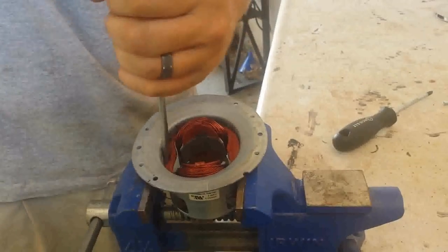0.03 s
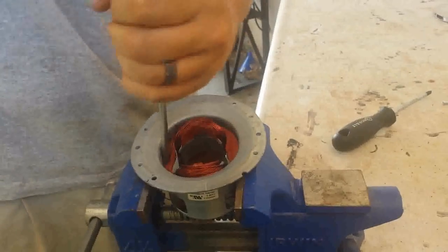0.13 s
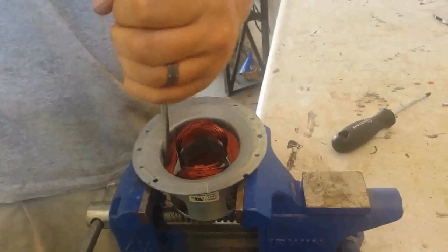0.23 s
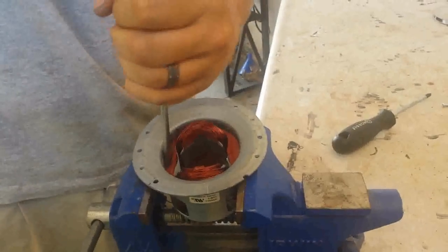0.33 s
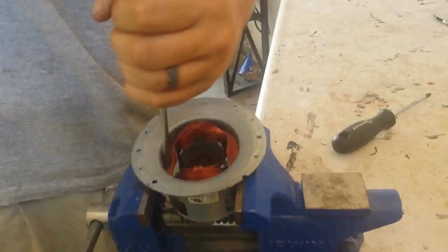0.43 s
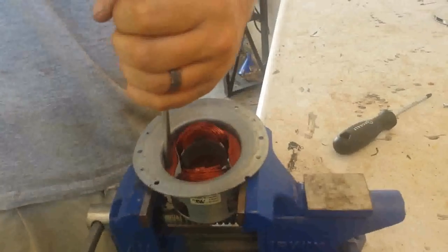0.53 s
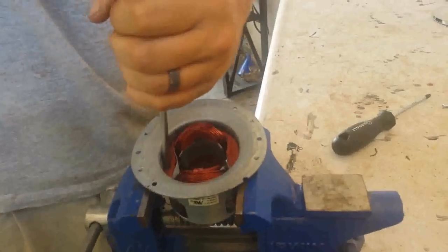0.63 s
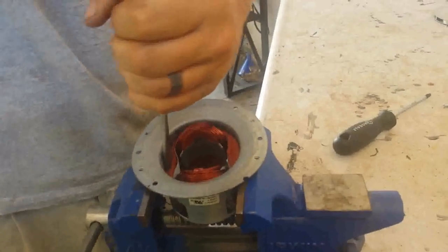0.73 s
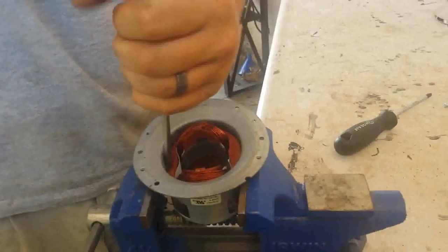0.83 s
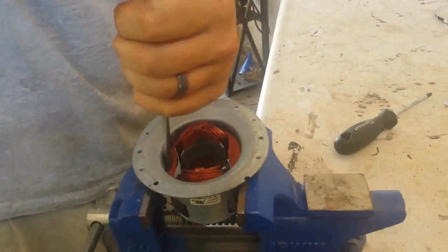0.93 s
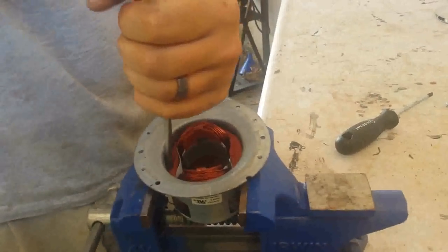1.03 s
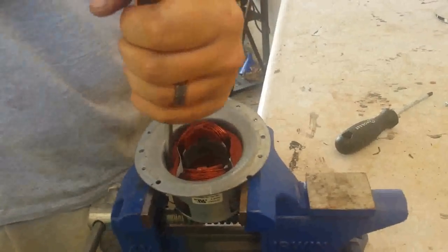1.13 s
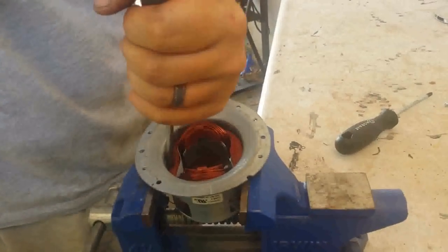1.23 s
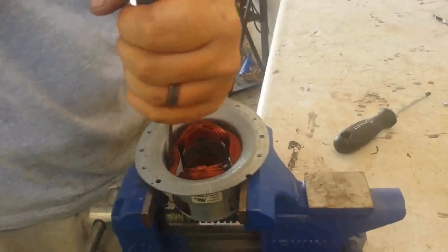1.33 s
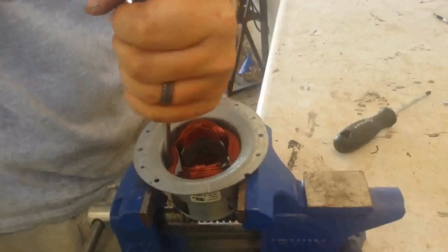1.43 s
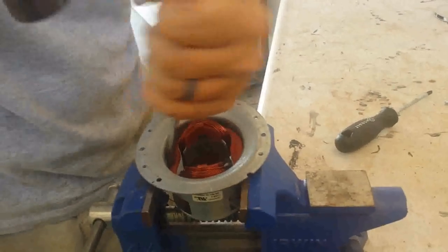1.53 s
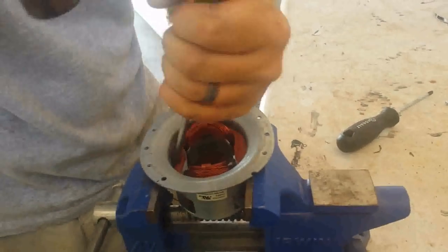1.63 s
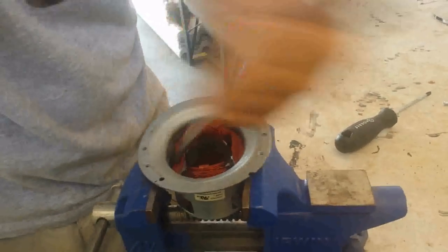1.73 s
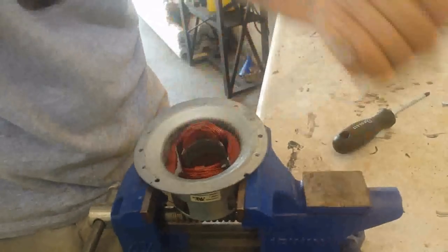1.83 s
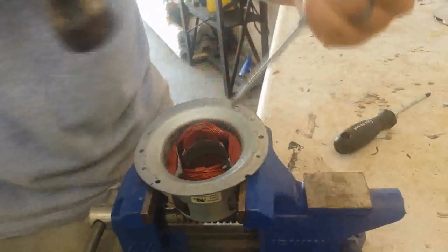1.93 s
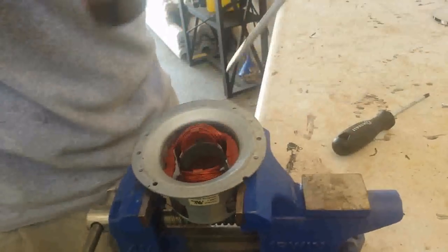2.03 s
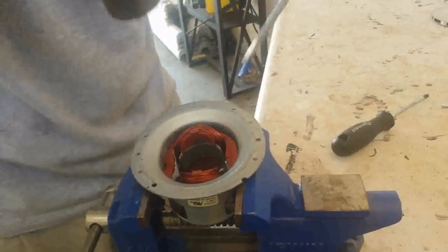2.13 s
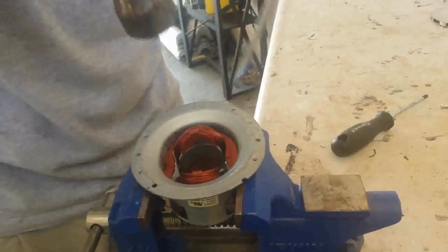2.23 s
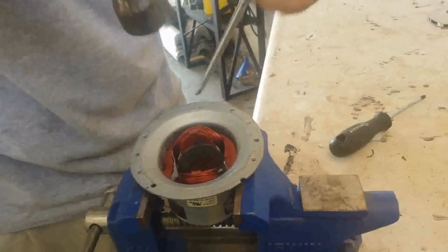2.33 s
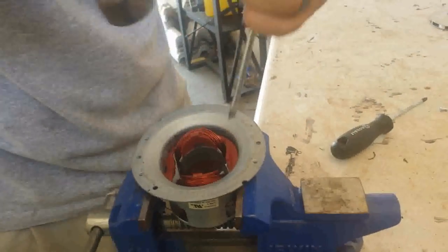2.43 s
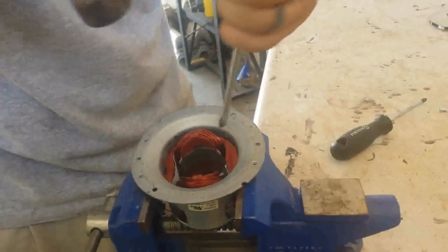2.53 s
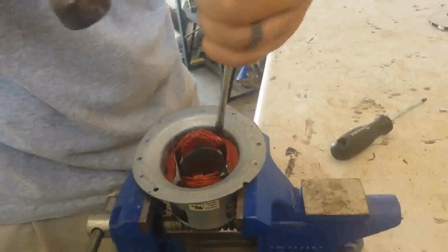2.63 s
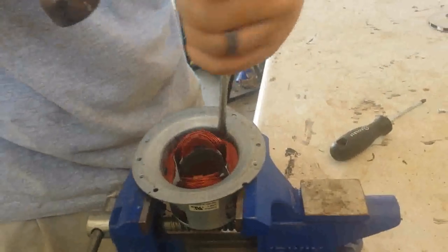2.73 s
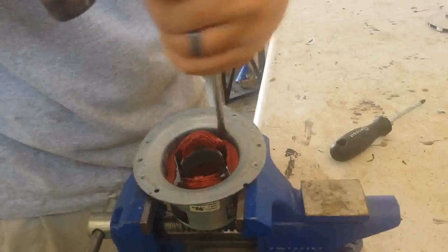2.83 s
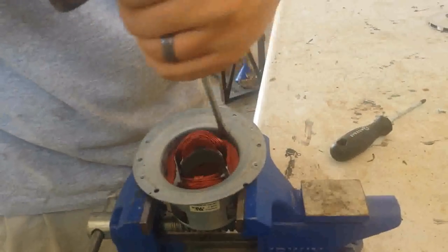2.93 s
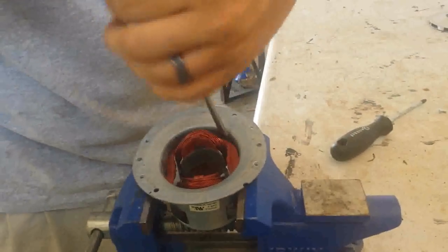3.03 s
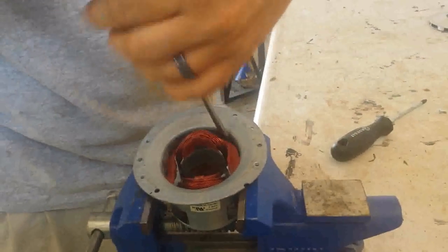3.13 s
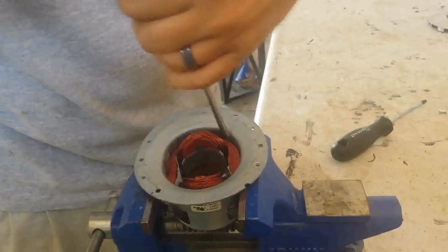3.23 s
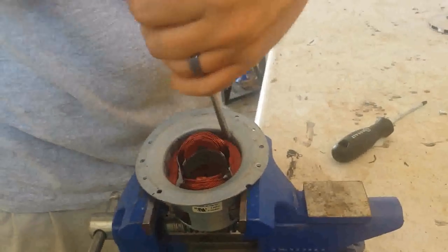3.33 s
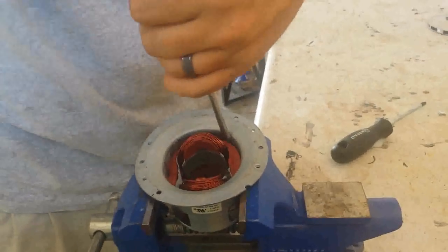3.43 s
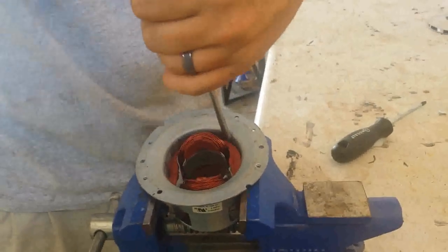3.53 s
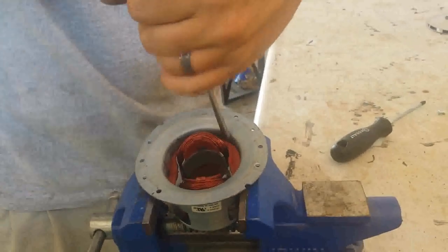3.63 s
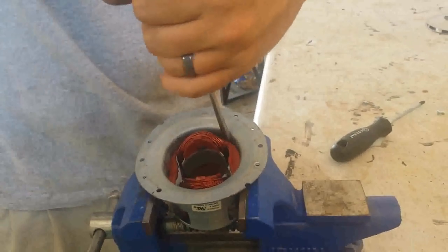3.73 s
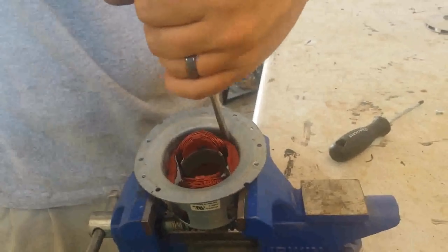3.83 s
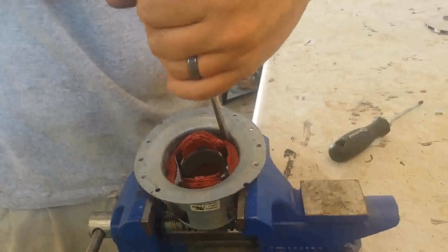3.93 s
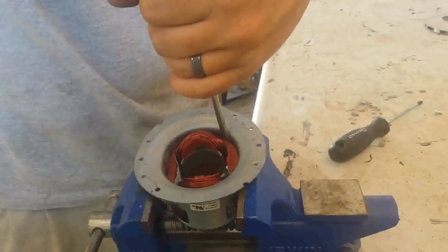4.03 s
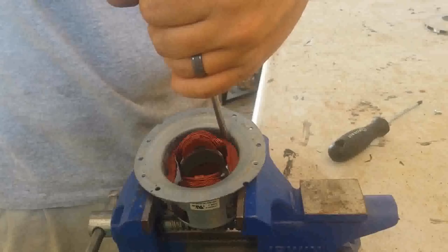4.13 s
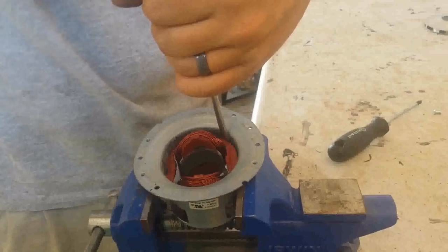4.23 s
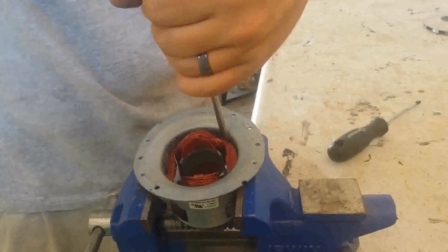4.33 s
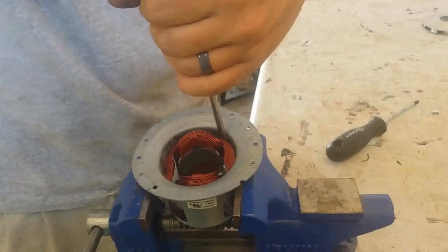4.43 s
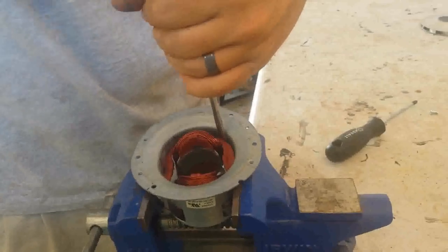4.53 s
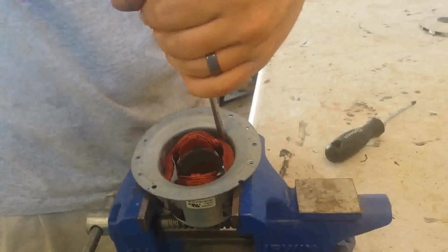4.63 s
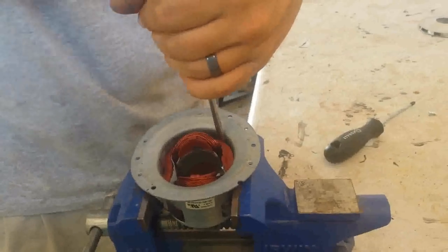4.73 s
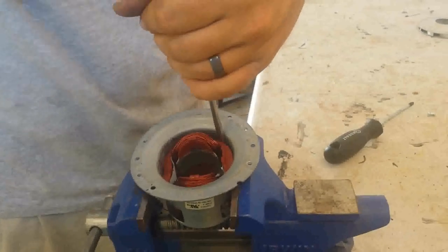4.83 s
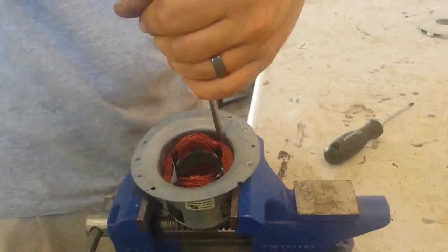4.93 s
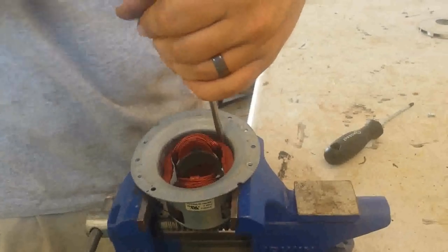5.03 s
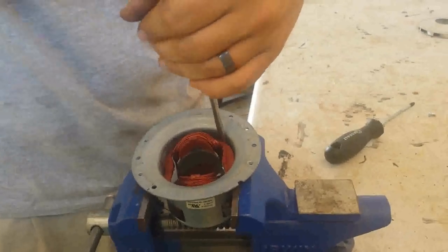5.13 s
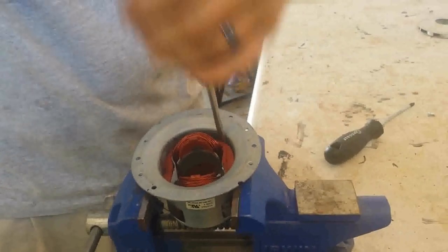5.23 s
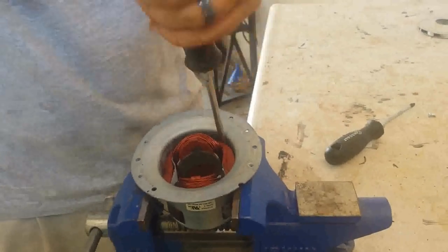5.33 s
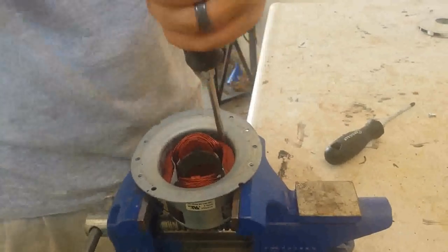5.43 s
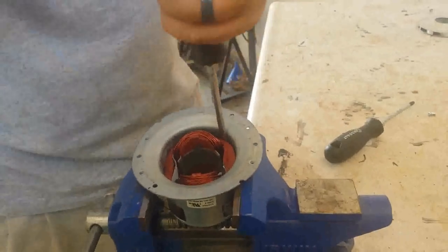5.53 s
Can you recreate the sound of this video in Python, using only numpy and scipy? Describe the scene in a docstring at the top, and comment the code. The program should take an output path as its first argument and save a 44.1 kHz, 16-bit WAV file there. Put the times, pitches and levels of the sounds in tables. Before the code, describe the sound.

Close, slightly overloaded stereo sound of hammering at a workshop bench. The clip opens in the ring of a blow just struck, with further hard blows at about 0.2, 0.5 and 0.8 seconds. Each is a sharp steel crack with a bright, chattering high clang that stops abruptly, a hollow metal housing tone, a low bench thud and a brief loose rattle in the room. The ringing dies away into quiet, low workshop air. Around 1.6 to 2.0 seconds the blade is pulled out, with soft rumble, sleeve rustle and a bright clink near 1.9. Faint skids and ticks at 2.6 to 2.8 and a light clink at 3.0 mark it being set again, followed by dull grip movement. From 3.7 seconds six blows fall steadily, roughly every 0.28 seconds, until 5.1; the first is the heaviest, with a deeper thud. The last one rings out to the end.

```python
"""A hammer drives a screwdriver into a motor housing held in a bench vise: two runs of blows.
Each blow is a noise crack, fading tones for steel, housing and bench, a shaft clang and a noise rattle.
Between the runs the blade is pulled out, clinks and skids on the housing (ticks, short rings) and is set again.
The grip rumbles and a sleeve rustles (shaped noise) over quiet workshop air.
Two unlike microphones hear it all; a limiter turns down each blow just after its first milliseconds."""
import sys
import numpy as np
from scipy import signal
from scipy.fft import rfft, irfft, next_fast_len
from scipy.io import wavfile
from scipy.ndimage import uniform_filter1d

SR = 44100
rng = np.random.default_rng(int(sys.argv[2]) if len(sys.argv) > 2 else 0)


def materialize(psi):
    """Save the field psi as 16-bit PCM at rate SR to the path in sys.argv[1].

    A 1-D psi becomes a single channel; in a 2-D psi each row is a channel.
    """
    bounded = np.clip(np.atleast_2d(psi).T, -1, 1)
    quanta = np.round(bounded * 32767).astype(np.int16)
    wavfile.write(sys.argv[1], SR, quanta)


N = 246954

# All dB values in the tables are relative; t60 is the time a sound takes to fall by 60 dB.
# hammer blows, one a row: (time [s], crack [dB], thud [dB], clang [dB], clang length [s])
BLOWS = [(-0.068, -1, -7, -10.5, 0.069), (0.206, 1.5, -1, -8, 0.058), (0.4883, -0.5, -0.5, -10, 0.067),
         (0.7676, 3, -4, -10, 0.067), (3.7358, 1.5, 5.5, -15, 0.037), (4.032, -1, -1.5, -19, 0.054),
         (4.3047, 1, -3, -9, 0.044), (4.5836, -0.5, -2.5, -10, 0.05), (4.867, -4, -5.5, -9.5, 0.067),
         (5.144, -1.5, -1.5, -15.5, 0.068)]
# the blade touching the housing:
# (time [s], level [dB], brightness [dB per octave], ring [dB], housing knock [dB])
BLADE_TOUCHES = [(1.648, -48, -16.5, -3, 9), (1.819, -15.5, 2, -15, -25), (1.853, -35.5, -6, -4.5, -2),
                 (1.8756, -2, 2, -12.5, -11.5), (2.027, -34, 0, -2, -10), (2.572, -33.5, -8, 7, -7),
                 (2.806, -35, -3.5, 0, -15.5), (3.002, -17.5, -2, -1.5, -21), (3.475, -41, -3, 0, -10),
                 (4.772, -40.5, 11, 4, -12)]
# short skids of the tip on the housing: (middle [s], half length [s], level [dB])
SKIDS = [(1.717, 0.03, -57), (2.613, 0.038, -50), (2.683, .018, -46), (2.737, 0.024, -48),
         (2.802, 0.0071, -37)]
# hand moves: holding, pulling out, bringing back, regripping, bearing down, holding:
# (start [s], length [s], grip [dB], cloth [dB])
HAND_MOVES = [(-.1, 1.04, -43.5, -52), (1.635, .25, -46.5, -55.5), (2.763, 0.28, -51, -57),
              (3.072, 0.025, -38.5, -45.5), (3.396, 0.36, -42, -45.5), (3.756, 1.58, -46, -51)]

# tones of screwdriver and housing under a blow:
# (frequency [Hz], struck at the left rim [dB], at the right rim [dB], t60 [s])
STEEL_TONES = [(1570, -22, -27, 0.17), (1973, -5.5, -24, 0.13), (2080, -23, -14.5, 0.11),
               (2290, -34.5, -22.5, 0.18), (2525, -21.5, -24, 0.24), (2727, -22, -24.5, 0.24),
               (2960, -41, -25, 0.42), (3260, -39, -21.5, 0.18), (4360, -32, -29, 0.43),
               (4260, -19.5, -27, .22), (5570, -22, -25, 0.087), (5150, -27.5, -13, 0.079),
               (5370, -38, -29, 0.31), (6300, -9, -27, 0.073), (6480, -8.5, -35, 0.14),
               (9460, -24.5, -47, 0.099), (10290, -27.5, -34, .2)]
# tones of the hollow housing: (frequency [Hz], level [dB], t60 [s])
HOUSING_TONES = [(562.6, -35, 2), (617, -27.5, 0.42), (658, -23.5, 0.34), (747, -20.5, .25),
                 (793, -33, 0.76), (858, -26.5, 0.48), (964, -17, 0.22), (1117, -19.5, 0.23),
                 (1268, -15.5, 0.11)]
# tones of vise and bench: (frequency [Hz], level [dB], t60 [s])
BENCH_TONES = [(123.44, -25, 0.87), (137.5, -12.5, 0.25), (178.9, -41.5, 1.3), (230.7, -18, 0.51),
               (257.5, -20.5, 0.38), (283.4, -38, 1.7), (316.7, -13.5, 0.22), (356, -22.5, 0.56),
               (383.8, -30.5, 0.87), (443.5, -18, 0.24), (482.2, -18, 0.23), (526, -26.5, 0.11)]
# tones of the loosely held blade: (frequency [Hz], level [dB], t60 [s])
BLADE_TONES = [(958, -20, 0.33), (1120, -16, 0.17), (1700, -35, 0.066), (1970, -21, 0.12), (2070, -8.5, .1),
               (2425, -9.5, 0.13), (2910, -16, 0.044), (3530, -9.5, 0.088), (3974, -5, 0.087),
               (4260, -17.5, 0.057), (4400, -5.5, 0.091), (5710, -1, 0.036), (6210, -8.5, 0.066),
               (7080, -15, 0.058), (8700, -24.5, 0.04)]
# the shaft chattering in its seat: (frequency [Hz], level [dB])
CLANG_TONES = [(5205, -16), (5262, -3.5), (5335, -19)]
# the long pure after-ring of the shaft: (frequency [Hz], level [dB], t60 [s])
SHAFT_TONES = [(5160, -2, 1.02), (5195, -8, 0.78)]
# the hammer head, which rings on after the opening blow: (frequency [Hz], level [dB], t60 [s])
HEAD_TONES = [(4430, -33, 0.78)]

# noise colour of a blow's crack: (frequency [Hz], density [dB per Hz])
CRACK_COLOUR = [(40, -36), (450, -17), (900, 6.5), (1600, 4.5), (2500, 0.5), (4200, 4), (6000, 7.5),
                (7500, 2), (10000, -17), (15000, -16.5)]
# noise colour of the rattle: (frequency [Hz], density [dB per Hz])
RATTLE_COLOUR = [(25, -41), (80, -58), (130, 5), (300, 15), (600, 4.5), (1100, 3), (1700, 2), (2900, 8.5),
                 (4300, 5), (5600, 10), (7600, 4.5), (8500, -2.5), (9400, -3), (12000, -13.5), (15000, -18)]
# noise colour of a blade touch: (frequency [Hz], density [dB per Hz])
CLINK_COLOUR = [(100, -19.5), (700, -25), (1700, -16.5), (2200, -8.5), (3000, -10.5), (4000, -2),
                (6500, -6.5), (8000, -7), (12000, -20.5), (15000, -33.5)]
# noise colour of the workshop air: (frequency [Hz], density [dB per Hz])
AIR_COLOUR = [(25, -32.5), (70, -9.5), (150, 9.5), (300, -5.5), (700, -9.5), (2000, -17), (6000, -17.5),
              (9000, -29), (15000, -38)]
# noise colour of the hand on the tool: (frequency [Hz], density [dB per Hz])
GRIP_COLOUR = [(25, -13), (80, -0.5), (180, 7), (280, 0), (500, -6.5), (750, -13.5), (1200, -19.5),
               (3000, -40.5)]
# noise colour of the sleeve: (frequency [Hz], density [dB per Hz])
CLOTH_COLOUR = [(200, -13), (900, 6), (2500, 0), (5500, -1), (8000, -7), (11000, -23), (15000, -17.5)]

# how fast sound dies in the workshop: (frequency [Hz], t60 [s])
ROOM_DECAY = [(60, 0.51), (300, 0.5), (700, 0.57), (1500, 0.5), (3500, 0.33), (7000, 0.3), (13000, 0.28)]
# how alike diffuse sound is at the two microphones: (frequency [Hz], likeness [0 to 1])
LIKENESS = [(130, .99), (280, 0.98), (550, 0.79), (1000, 0.38), (2000, 0)]
# tone difference of the two microphones: (frequency [Hz], left minus right [dB])
MIC_BALANCE = [(150, 0), (550, 1), (1100, 1.5), (2700, 8), (4500, 5), (5500, 6), (6800, 0), (9000, -4),
               (10500, -9), (15000, -6.5)]

TAIL = np.arange(int(.95 * SR)) / SR  # time axis of one blow or touch (s)
EDGE_HZ = 16000  # upper band limit
RESET_S = 2.5  # the tip stands on the left rim before this time, on the right rim after it
HOUSING_DB, BENCH_DB = 0.5, -1.25  # how strongly the housing and the bench join in a blow
RATTLE_PER_THUD, BENCH_PER_THUD = 0.28, .45  # dB of rattle and of bench shake for each dB of thud
AFTER_RING_DB, JAM_DB_PER_S = -21, 248.5  # the longer the shaft chatters, the less pure ring is left
SWELL_LEFT_S, SWELL_RIGHT_S = .011, .025  # the chatter builds more slowly on the right rim
CONTACT_T60_S = 0.045  # how fast the tick of a touch dies
CLINK_ROOM_DB, ROOM_PER_KNOCK = -5.5, 0.54  # harder knocks fill the room more (dB, dB per dB)
MOVE_ATTACK_S, MOVE_RELEASE_S = .02, 0.33  # a move starts quickly and settles slowly


def amp(db):
    """Turns decibels into gain."""
    return 10 ** (np.asarray(db) / 20)


def evened(x):
    """Scales a signal to an average strength (rms) of 1."""
    return x / np.sqrt(np.mean(x ** 2) + 1e-20)


def read(points, hz):
    """Reads a table between its points, on a log-frequency axis."""
    f, value = np.transpose(points)
    return np.interp(np.log(hz + 1), np.log(f + 1), value)


def add(mix, s, sound):
    """Mixes a stereo sound in at time s, which may lie before the start."""
    start = round(s * SR)
    sound = sound[:, max(-start, 0):]
    part = mix[:, max(start, 0):][:, :sound.shape[1]]
    part += sound[:, :part.shape[1]]


def fade(t60):
    """Fades steadily in dB along the tail, by 60 dB in t60 seconds."""
    return np.exp(-np.log(1000) * TAIL / t60)


def rise(seconds):
    """Gives a sound a soft start along the tail."""
    return 1 - np.exp(-TAIL / seconds)


def noise(spectrum, size, tilt_db=0, direct=False, lag_s=5.5e-5):
    """Coloured stereo noise, diffuse or direct, reaching the right microphone slightly before the left."""
    length = next_fast_len(size, True)
    hz = np.fft.rfftfreq(length, 1 / SR)
    right, other = rfft(rng.standard_normal((2, length)))
    same = 0.6 * np.ones(len(hz)) if direct else read(LIKENESS, hz)
    same = np.clip(same, -1, 1)
    left = same * right + np.sqrt(1 - same ** 2) * other
    left = left * np.exp(-2j * np.pi * hz * lag_s)  # the delay
    octaves_above_1k = np.log2(np.maximum(hz, 1000) / 1000)
    colour = amp(read(spectrum, hz) + tilt_db * octaves_above_1k)
    return evened(irfft(np.array([left, right]) * colour, length)[:, :size])


def wander(rate_hz, rows, step=128):
    """Slow random drift of height and phase along the tail (rms about 1), one row a tone."""
    steps = rng.standard_normal((rows, 2, len(TAIL) // step + 2))
    memory = np.exp(-2 * np.pi * rate_hz * step / SR)
    slow = signal.lfilter([1], [1, -memory], steps[:, 0] + 1j * steps[:, 1])
    # reversed, so that the drift is already in full swing at the strike
    slow = slow[:, ::-1] / np.sqrt(np.mean(abs(slow) ** 2))
    return [np.interp(np.arange(len(TAIL)) / step, np.arange(len(row)), row) for row in slow]


def ring(modes, scatter_db, blur=0):
    """Struck metal as fading tones, different each time, blurred by reflections, stereo apart when high."""
    out = np.zeros((2, len(TAIL)))
    blur = np.clip(blur, 0, 1)
    chances = rng.standard_normal((len(modes), 3))
    for (hz, db, t60), (size, turn, apart), drift in zip(modes, chances, wander(20, len(modes))):
        # the less alike the microphones hear this pitch, the more its phases part
        spread = np.arccos(np.clip(read(LIKENESS, hz), -1, 1)) * np.sign(apart) / 2
        tone = amp(db + scatter_db * size) * fade(t60) * np.exp(2j * np.pi * (hz * TAIL + turn))
        tone = tone * (np.sqrt(1 - blur) + np.sqrt(blur) * drift)
        out += (tone * np.exp(1j * np.array([[spread], [-spread]]))).real
    return out


def resonant(x, depth_db, size=2 ** 16, order=70):
    """Housing and vise have countless tones: narrow peaks and valleys, deepest in the treble."""
    hz = np.fft.rfftfreq(size, 1 / SR)
    peaks = evened(np.convolve(rng.standard_normal(len(hz)), np.hanning(2 * order), "same"))
    gain = amp(depth_db * peaks * np.minimum(hz / 1000, 1))  # shallower below 1 kHz
    return evened(irfft(rfft(x, size) * gain, size)[..., :x.shape[-1]])


def reverberate(x):
    """Lets each frequency band die at the speed of the workshop."""
    hz, t, z = signal.stft(x, SR, nperseg=256)
    decay = np.exp(-np.log(1000) * t / read(ROOM_DECAY, hz)[:, None])
    return signal.istft(z * decay, SR, nperseg=256)[1][:, :len(TAIL)]


def clatter(depth_db, t60, size=130):
    """Uneven rebounds of loose parts: a gain that jumps about every few milliseconds and then settles."""
    jumps = evened(uniform_filter1d(rng.standard_normal(len(TAIL)), size=size))
    return amp(depth_db * jumps * fade(t60))


def workshop_air(level_db=-55.5):
    """The quiet air of the workshop: steady, low-heavy noise."""
    return amp(level_db) * noise(AIR_COLOUR, N)


def hands(uneven_db=1.5):
    """The grip shifts on the tool with a dull rumble while the sleeve brushes the shirt."""
    start, length, grip_db, cloth_db = np.transpose(HAND_MOVES)[:, :, None]
    t = np.maximum(np.arange(N) / SR - start, 0)
    moving = (1 - np.exp(-t / MOVE_ATTACK_S)) * np.exp(-np.maximum(t - length, 0) / MOVE_RELEASE_S)
    catches = uneven_db * evened(uniform_filter1d(rng.standard_normal(N), size=900))
    # where moves overlap, the stronger one counts
    grip = (amp(grip_db) * moving).max(0) * amp(catches) * noise(GRIP_COLOUR, N)
    cloth = (amp(cloth_db) * moving).max(0) * amp(catches / 2) * noise(CLOTH_COLOUR, N)
    return grip + cloth


def clang(length_s, swell_s, stop_s=0.0032, chatter_db=4.5):
    """The shaft sings as it chatters in its seat after the blow, until it jams."""
    chatter = evened(uniform_filter1d(rng.standard_normal(len(TAIL)), size=220))
    stop = (1 - np.tanh((TAIL - length_s) / stop_s)) / 2
    swell = rise(swell_s) ** 2 * stop * amp(chatter_db * chatter)
    phases = 2 * np.pi * rng.random((len(CLANG_TONES), 2, 1))
    tones = sum(amp(db) * np.sin(2 * np.pi * hz * TAIL + phase)
                for (hz, db), phase in zip(CLANG_TONES, phases))
    return swell * tones


def hammer(snap_db=6, snap_t60=0.0015, knock_db=-1, knock_t60=0.024,
           rattle_db=-10.0, alike=0.25, peaky_db=1.5, clatter_db=3):
    """Steel on steel: a crack, ringing metal, the heavier bench swinging up later, a rattle in the room."""
    out = np.zeros((2, N))
    alike = np.clip(alike, 0, 1)
    usual = noise(RATTLE_COLOUR, len(TAIL))  # blow after blow travels the same paths
    for s, crack_db, thud_db, clang_db, clang_s in BLOWS:
        on_right = s > RESET_S
        contact = amp(snap_db) * fade(snap_t60) + amp(knock_db) * fade(knock_t60)
        crack_noise = noise(CRACK_COLOUR, len(TAIL), direct=True)
        crack = amp(crack_db) * crack_noise * contact * rise(0.0011)

        fresh = noise(RATTLE_COLOUR, len(TAIL))
        paths = resonant(np.sqrt(alike) * usual + np.sqrt(1 - alike) * fresh, peaky_db)
        rattle = amp(rattle_db + RATTLE_PER_THUD * thud_db) * clatter(clatter_db, t60=0.57)
        rattle = rattle * reverberate(paths) * rise(0.02)

        modes = [(hz, right_db if on_right else left_db, t60)
                 for hz, left_db, right_db, t60 in STEEL_TONES]
        steel = ring(modes, scatter_db=1.2, blur=.55) * rise(.003)
        shaft = amp(AFTER_RING_DB - JAM_DB_PER_S * clang_s) * ring(SHAFT_TONES, scatter_db=2.0)
        housing = ring(HOUSING_TONES, scatter_db=0.5, blur=0.56) * rise(0.0029)
        housing = amp(HOUSING_DB + thud_db) * housing
        bench = ring(BENCH_TONES, scatter_db=3.5, blur=0.14) * rise(0.0061)
        bench = amp(BENCH_DB + BENCH_PER_THUD * thud_db) * bench
        singing = amp(clang_db) * clang(clang_s, SWELL_RIGHT_S if on_right else SWELL_LEFT_S)
        add(out, s, crack + rattle + steel + shaft + housing + bench + singing)
    add(out, BLOWS[0][0], ring(HEAD_TONES, scatter_db=1.5))
    return out


def blade(peaky_db=3.0):
    """Light touches of the blade: a bright tick, a short ring, a housing knock and the room's answer."""
    out = np.zeros((2, N))
    for s, db, tilt_db, ring_db, knock_db in BLADE_TOUCHES:
        near = noise(CLINK_COLOUR, len(TAIL), tilt_db, direct=True)
        far = noise(CLINK_COLOUR, len(TAIL), tilt_db)
        near, far = resonant(np.array([near, far]), peaky_db)
        tick = near * fade(CONTACT_T60_S)
        tone = amp(ring_db) * ring(BLADE_TONES, scatter_db=-3.0, blur=1.0)
        knock = ring(BENCH_TONES + HOUSING_TONES, scatter_db=0.6) * fade(1.0)  # damped by the hand
        knock = amp(knock_db) * knock
        room = amp(CLINK_ROOM_DB + ROOM_PER_KNOCK * knock_db) * clatter(depth_db=3.0, t60=1.1)
        room = room * reverberate(far) * rise(0.0012)
        add(out, s, amp(db) * (tick + tone + knock + room) * rise(0.00084))
    return out


def slide(catches_per_s=900, damping=3):
    """The sliding tip catches on the casting many times a second and keeps the blade ringing."""
    catches = (rng.random(N) < catches_per_s / SR) * rng.standard_normal(N)
    modes = ring([(hz, db, t60 / damping) for hz, db, t60 in BLADE_TONES], scatter_db=4.5)
    rubbing = evened(signal.oaconvolve(catches[None], modes, axes=1)[:, :N])
    t = np.arange(N) / SR
    # each skid swells and fades
    return rubbing * sum(amp(db) * np.exp(-((t - s) / half_s) ** 2) for s, half_s, db in SKIDS)


def scene():
    """The work at the bench over the quiet air of the workshop."""
    return workshop_air() + hands() + hammer() + blade() + slide()


def record(dry, limit_db=-13.5, recover_db_per_s=220, attack_s=0.006):
    """Two unlike microphones, a quick limiter, overload and the band limit."""
    balance_db = read(MIC_BALANCE, np.fft.rfftfreq(2 * N, 1 / SR))
    mic_gain = amp(np.array([balance_db, -balance_db]) / 2)
    heard = irfft(rfft(dry, 2 * N) * mic_gain, 2 * N)[:, :N]

    # the limiter follows the loudest recent level, sinking back at a steady rate
    power_db = 10 * np.log10(abs(uniform_filter1d((heard ** 2).mean(0), size=130)) + 1e-12)
    recovery = np.arange(N) * recover_db_per_s / SR
    held_db = np.maximum.accumulate(power_db + recovery) - recovery
    over_db = np.maximum(held_db - limit_db, 0)
    keep = np.exp(-1 / (attack_s * SR))  # the first milliseconds of a blow slip through
    cut_db = signal.lfilter([1 - keep], [1, -keep], over_db)
    limited = np.clip(heard * amp(-cut_db), -.93, .93)  # overload flattens the peaks

    limited = signal.sosfilt(signal.butter(2, 55, "highpass", fs=SR, output="sos"), limited)
    band_limit = signal.firwin(255, EDGE_HZ, window=("kaiser", 9), fs=SR)
    return signal.oaconvolve(limited, band_limit[None], "same")


dry = scene()
out = record(dry)
materialize(out)
```